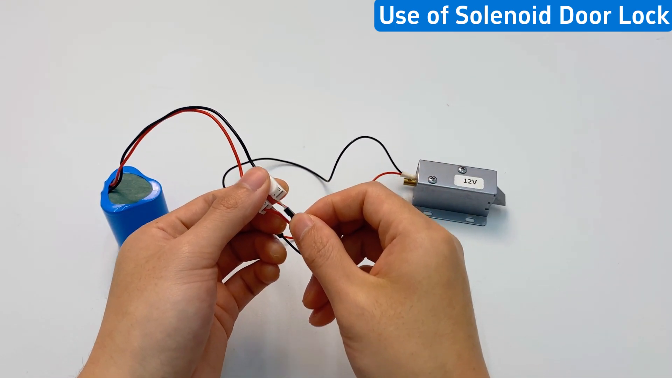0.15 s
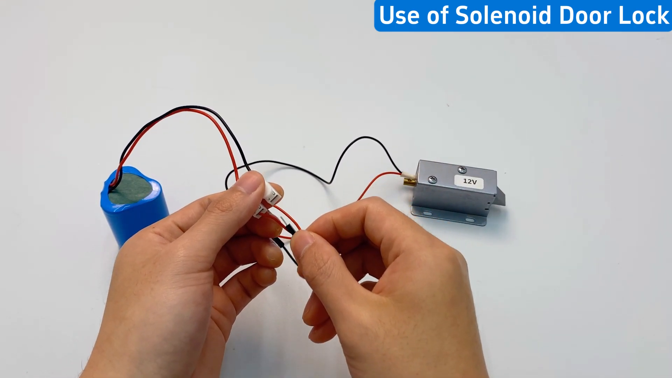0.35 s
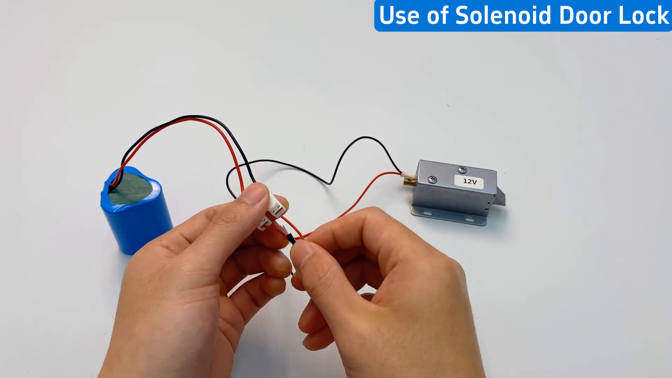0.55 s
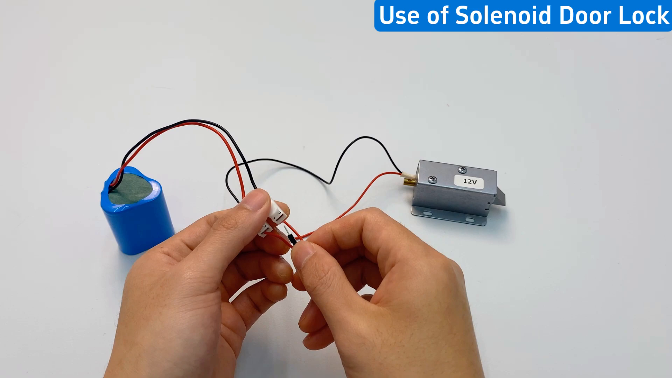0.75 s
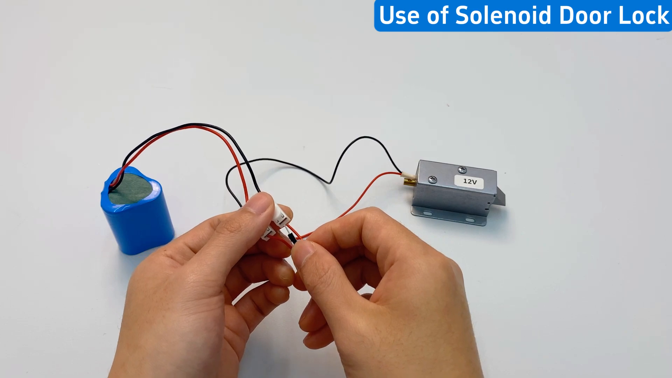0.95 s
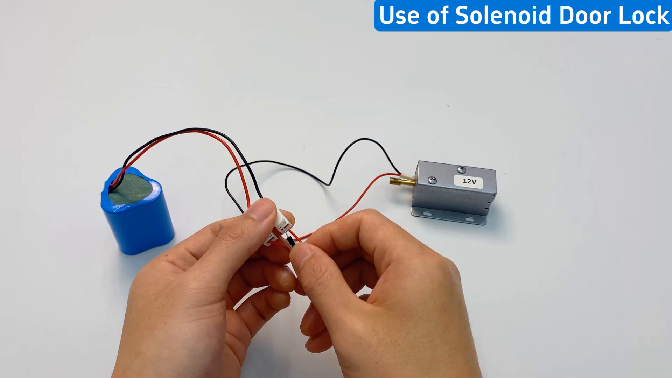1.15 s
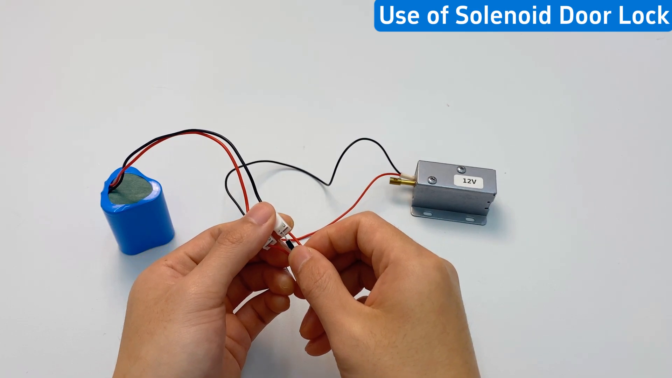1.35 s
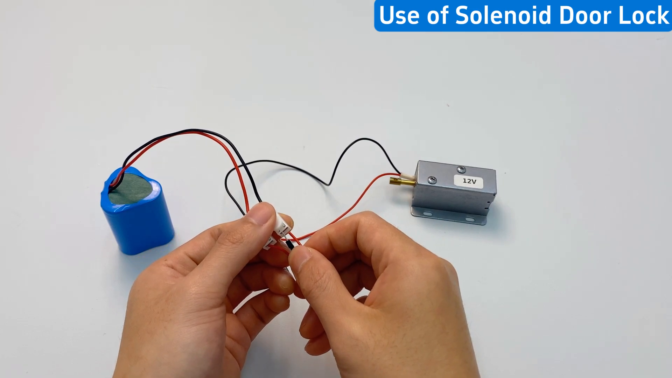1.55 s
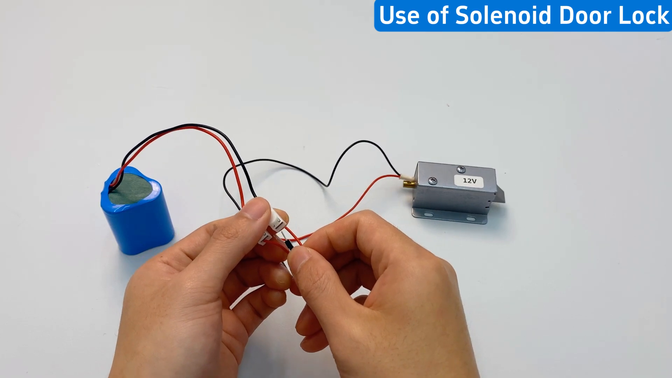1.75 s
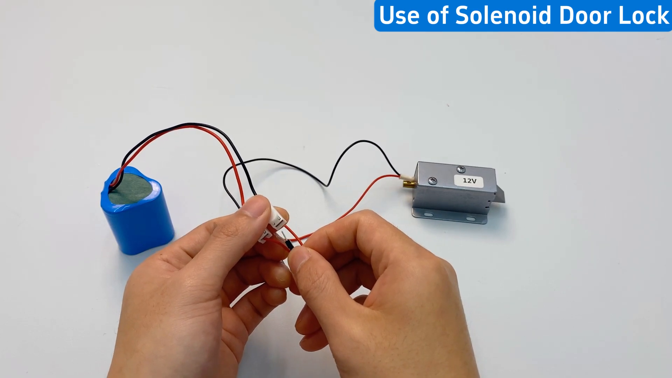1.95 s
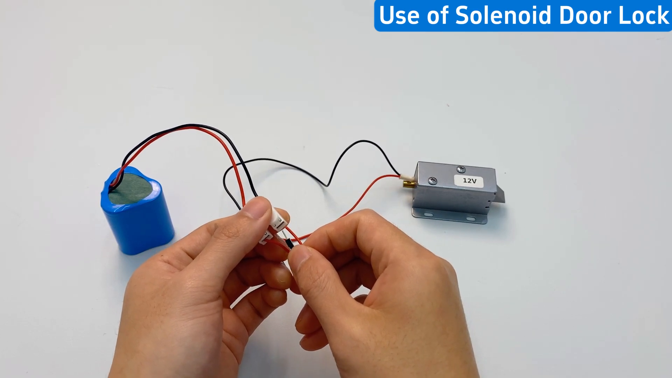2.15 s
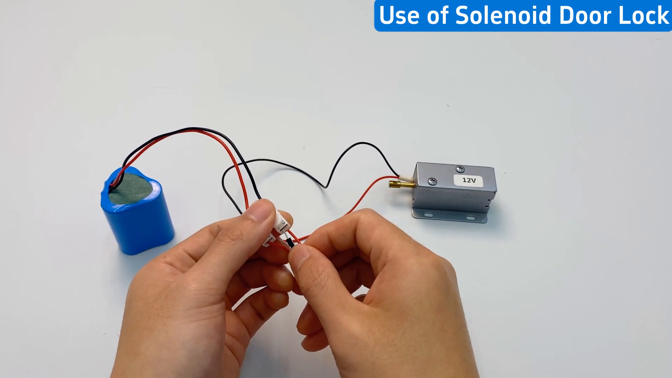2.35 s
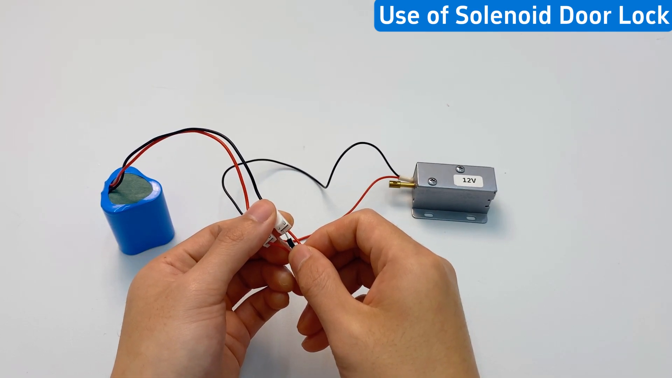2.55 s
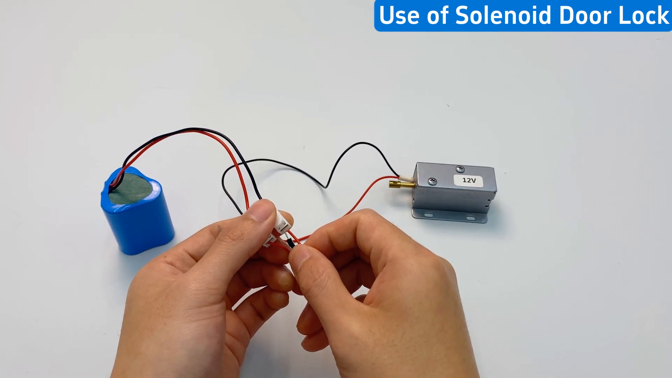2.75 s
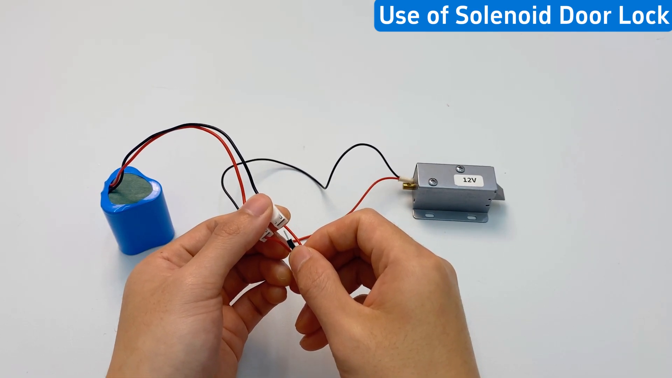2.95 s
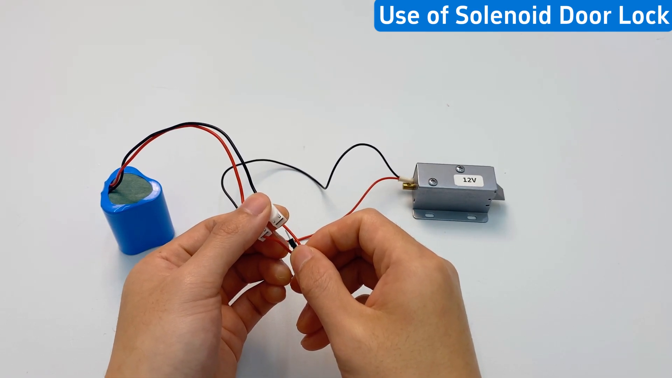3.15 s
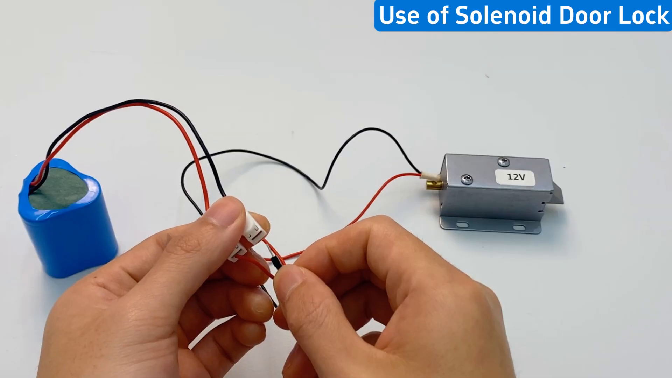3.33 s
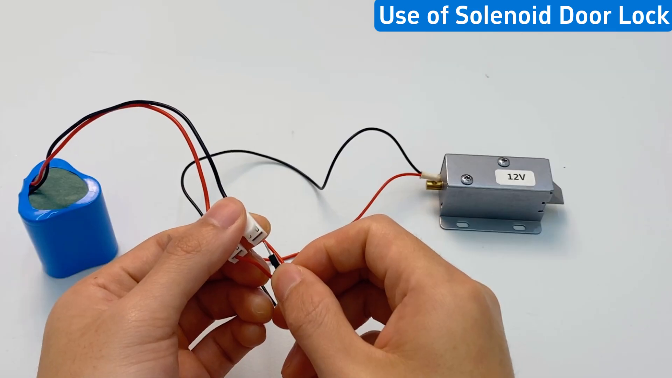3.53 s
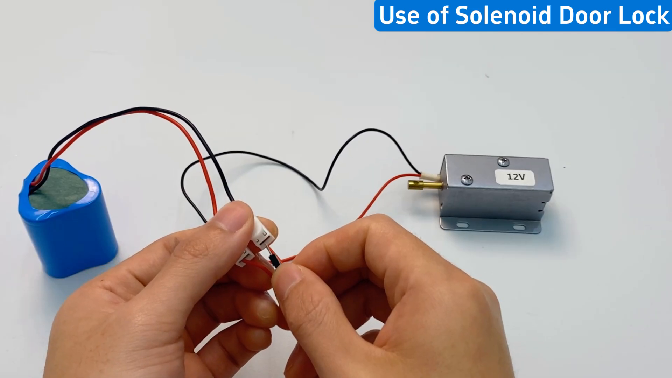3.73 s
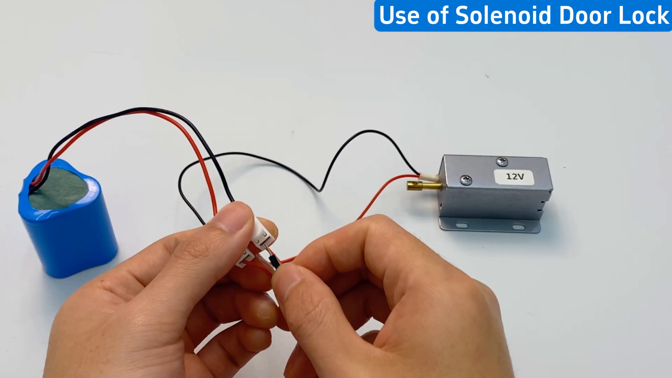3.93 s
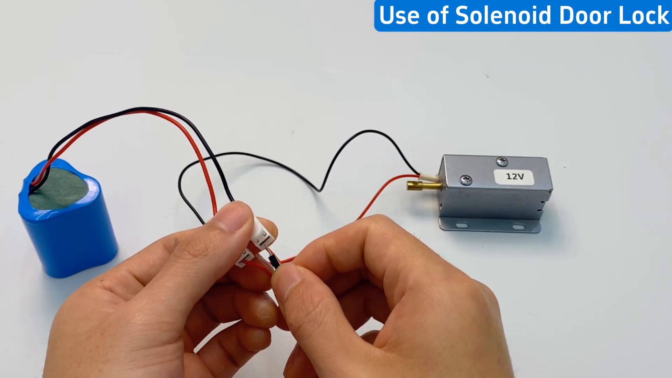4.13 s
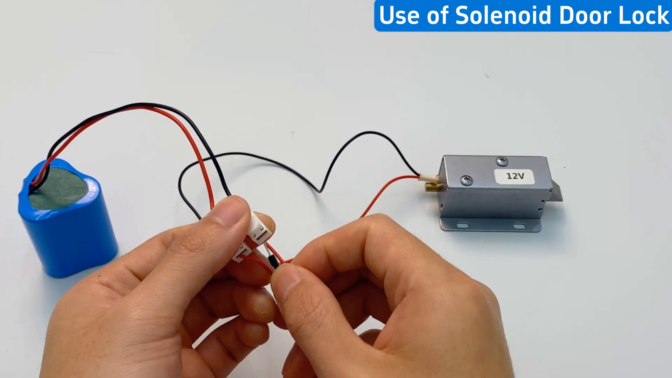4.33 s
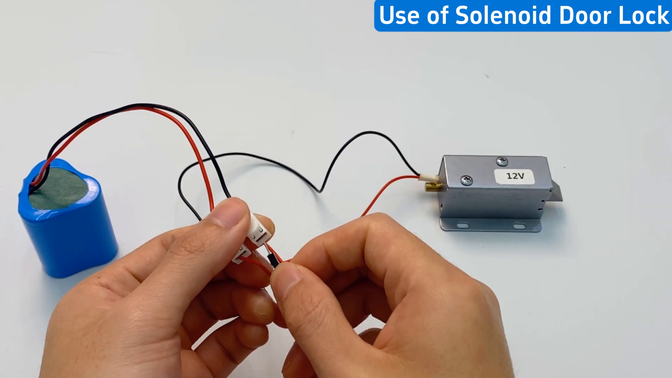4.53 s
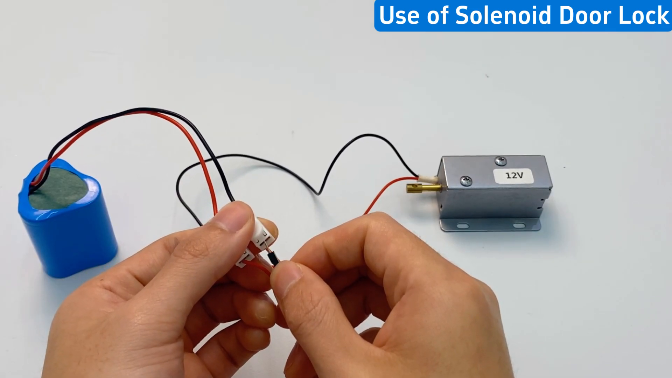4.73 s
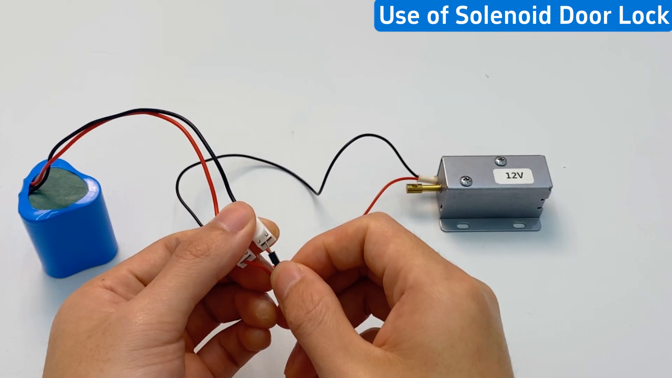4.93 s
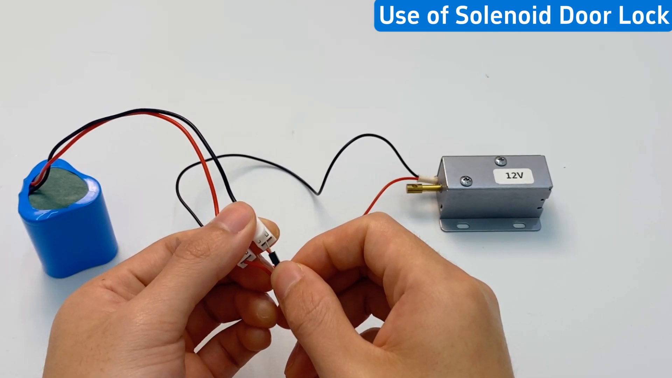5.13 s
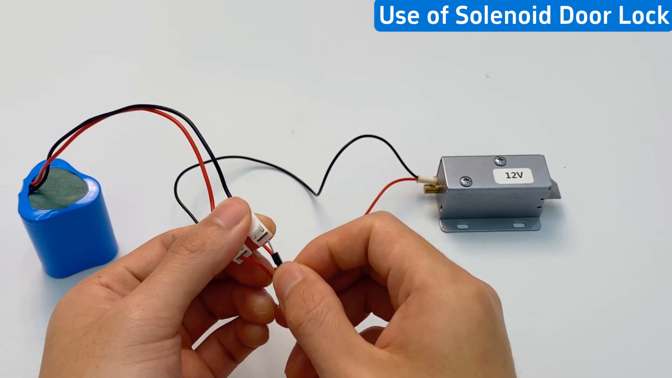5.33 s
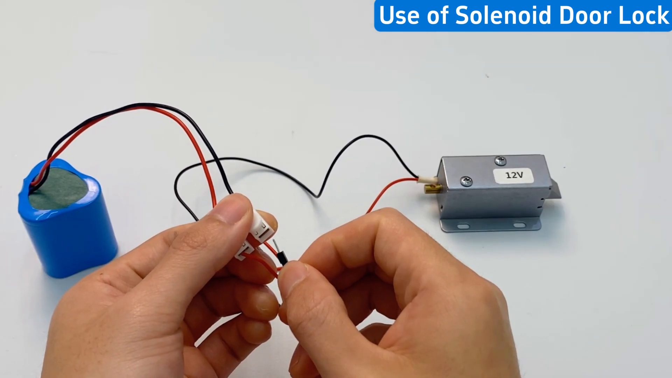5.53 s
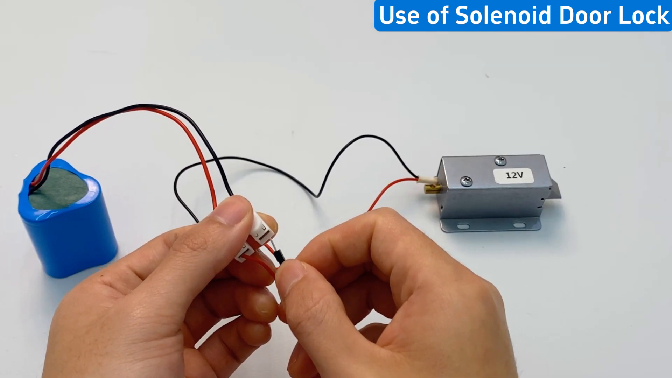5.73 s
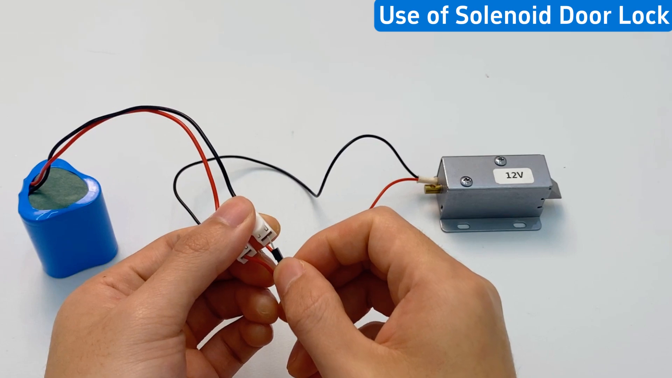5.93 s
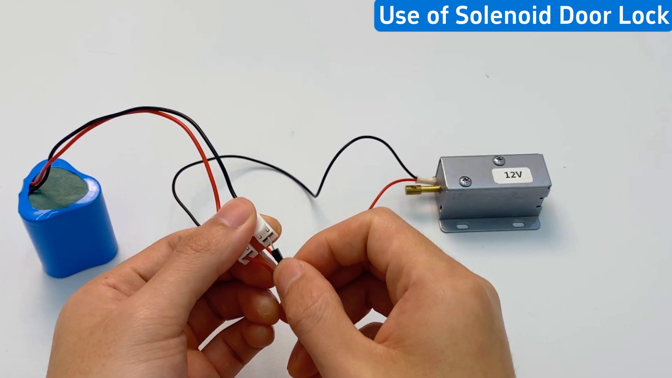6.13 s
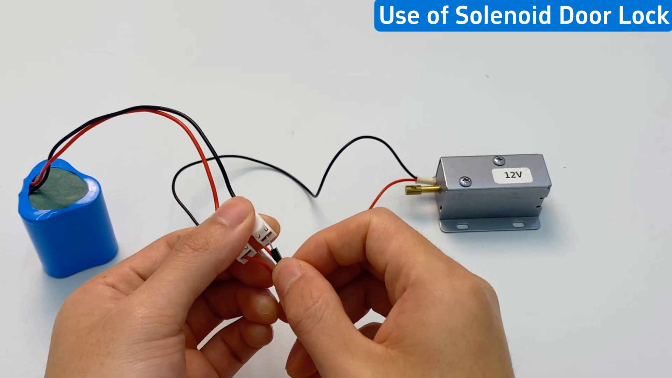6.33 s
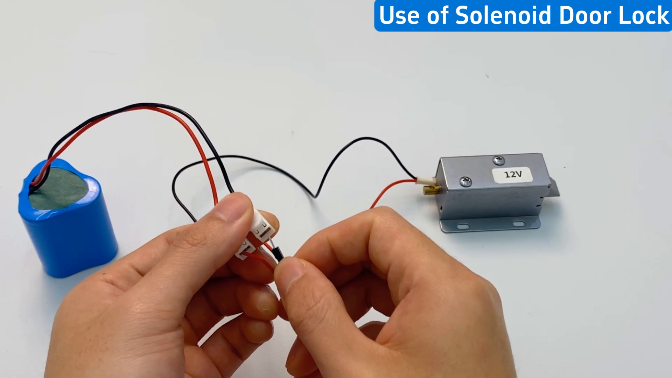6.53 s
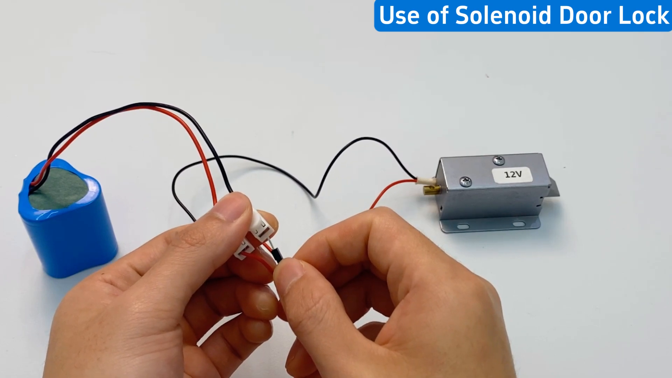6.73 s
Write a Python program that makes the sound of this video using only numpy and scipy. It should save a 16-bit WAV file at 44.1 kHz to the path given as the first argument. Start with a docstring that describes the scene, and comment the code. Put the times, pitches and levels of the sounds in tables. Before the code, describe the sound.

Loud, crisp metal clacks from a small electric door lock, bolt pulling in and shooting out irregularly, each with a bench thump and short room echo.

```python
"""A bare room, where a small solenoid lock lies on a bench and a battery lead is touched on and off by hand.
With power the plunger snaps into the core; without it the spring throws the bolt along its guide to its stop.
Each blow is a burst of noise filtered by the modes of the steel case; decaying sines give the bench thump.
Decaying noise serves as the room's echoes, and shaped noise as a faint, slightly wavering rumble."""
import sys
import numpy as np
from scipy import signal
from scipy.fft import rfft, irfft
from scipy.io import wavfile
from scipy.ndimage import uniform_filter1d

SR = 44100
rng = np.random.default_rng(int(sys.argv[2]) if len(sys.argv) > 2 else 0)


def generate_wav(sig):
    """Save sig (samples, or channels by samples) to the path in sys.argv[1] as 16-bit PCM at SR."""
    pcm = np.round(np.clip(np.atleast_2d(sig).T, -1, 1) * 32767).astype(np.int16)
    wavfile.write(sys.argv[1], SR, pcm)


N = 303408

# bolt thrown out by its spring: landing_s, blow_db, contact_spread_ms, bench_thump_db
BOLT_THROWS = [(0.1137, -0.5, 0.38, 2.5), (1.6890, 0, 1.1, 3), (2.8021, 0.3, 0.77, 2),
               (4.1838, -0.5, 0.58, 3), (5.34, -1.5, 0.75, 2), (6.4708, -0.34, 1.44, -0.5)]
LEAD_S = .06   # a blow's sound starts this long before its landing
SIZE = 65536   # samples in one blow
# time (s) and frequency (Hz) axes of one blow
T = np.arange(SIZE) / SR
HZ = np.arange(SIZE // 2 + 1) * SR / SIZE


def blows(rows, body, echoes, clang_db, side_db, chatter_db, swell_in_db, swell_in_s, swell_share):
    """Source and filter: each force excites the lock, heard directly and by way of the room, and thumps the bench."""
    # quickly damped clang of bolt and plunger: mode_hz, width_hz, relative_level_db
    clang_modes = [(3620, 350, 19), (7050, 250, 10), (8350, 500, 8), (11750, 350, 18), (12900, 400, 9),
                   (15250, 400, 6)]
    port_lag_s = .00002   # the right microphone hears the direct sound later
    lag = np.exp(-2j * np.pi * HZ * np.array([[0], [port_lag_s]]))
    ports = from_db([[-side_db], [side_db]]) * lag
    direct = with_modes(abs(body), clang_modes, clang_db) * ports
    out = np.zeros((2, N))
    for landing_s, blow_db, spread_ms, thump_db in rows:
        force = contact(spread_ms, chatter_db, chatter_s=0.0039,
                        swell_in_db=swell_in_db, swell_in_s=swell_in_s, likeness=.55)
        force = force * from_db(blow_db) * seating(vary_db=2.5)
        lock_sound = irfft(force * (direct + body * echoes))
        boom = thump(early_s=.002, swell_share=swell_share, side_db=1.5, vary_db=2.0)
        add(out, landing_s - LEAD_S, lock_sound + from_db(thump_db) * boom)
    return out


def contact(spread_ms, chatter_db, chatter_s, swell_in_db, swell_in_s, likeness):
    """Impact force: noise swells briefly into the landing, a tight cluster of contacts, and chatter decays to rest."""
    t = T - LEAD_S
    landing = np.exp(-.5 * (t * 1000 / spread_ms) ** 2)
    chatter = from_db(chatter_db) * np.exp(-abs(t) / chatter_s)
    swell_in = from_db(swell_in_db) * np.exp(-abs(t) / swell_in_s)
    envelope = landing + np.where(t > 0, chatter, swell_in)
    force = stereo(rng.standard_normal((2, SIZE)), likeness) * envelope
    # hard steel contacts spread their energy evenly over frequency: keep only the phase
    even = irfft(np.exp(1j * np.angle(rfft(force))))
    even = even * np.minimum(1, 10 * envelope)
    unit_energy = even / np.sqrt(np.sum(even ** 2, axis=1, keepdims=True))
    return rfft(unit_energy)


def seating(vary_db):
    """Varying modal excitation: no two blows seat alike, hence a fine random ripple over frequency."""
    ripple = rng.standard_normal(size=450)
    ripple_hz = np.linspace(0, SR / 2, len(ripple))
    return causal(from_db(vary_db * np.interp(HZ, ripple_hz, ripple)))


def case(crack, level_column, width_hz, ring_db):
    """Modal resonance: the steel case rings in clusters of close modes, weighted by where it is struck."""
    # modes of the case: mode_hz, pulled_in_relative_db, thrown_out_relative_db
    case_modes = [(1139, 11, 20), (1322, 15, 20), (1381, 14, 21), (1448, 14, 21), (1744, 12, 22),
                  (3330, 19, 17), (3472, 24, 21), (3583, 24, 22), (3634, 23, 21), (3698, 23, 21),
                  (3795, 23, 14), (3844, 23, 12), (3986, 21, 19), (4078, 21, 21), (4167, 20, 16),
                  (4955, 17, 21), (5033, 18, 17), (6245, 18, 11), (6342, 21, 14), (6390, 18, 15),
                  (6457, 20, 19), (6516, 22, 16), (6624, 24, 12), (7071, 13, 6), (8387, 12, 12),
                  (12158, 14, 13)]
    modes = [(mode[0], width_hz, mode[level_column]) for mode in case_modes]
    return with_modes(from_db(over_hz(crack)), modes, ring_db)


def thump(early_s, swell_share, side_db, vary_db):
    """Recoil drives low damped modes, never twice alike; the longer a mode lasts, the slower it builds."""
    # modes of bench top and room: mode_hz, t60_s, relative_starting_level_db
    bench_modes = [(54.6, 0.6, -52.5), (71, 0.34, -47), (104.9, 0.66, -35), (118, 0.21, -40),
                   (145, .2, -34.5), (159.8, 0.49, -32), (210, 0.18, -30), (235.4, 0.36, -41),
                   (280, 0.098, -48), (319.4, 0.45, -42.5), (356.6, 0.24, -35.5), (414, 0.16, -42.5),
                   (595, 0.38, -46.5), (729, 0.17, -51.5)]
    t = np.maximum(T - LEAD_S + early_s, 0)
    swings = 0
    chance_db = vary_db * rng.standard_normal(len(bench_modes))
    for k, (hz, t60_s, level_db) in enumerate(bench_modes):
        decay = from_db(level_db + chance_db[k] - 60 * t / t60_s)
        build = 1 - np.exp(-t / (swell_share * t60_s))
        sign = (-1) ** k   # neighbouring modes start in opposite directions
        swings = swings + sign * decay * build * np.sin(2 * np.pi * hz * t)
    return swings * from_db([[-side_db], [side_db]])


def unlatch(body, echoes, tick_db, tick_room_db, low_hz):
    """Release and friction: current stops, the plunger leaves the core with a thin tick, the bolt knocks its guide."""
    # knocks along the guide in every throw: before_landing_s, case_shove_db, scrape_db
    guide_knocks = [(0.021, -3.5, -18.5), (.011, 10, -15)]
    bolt_travel_s = .0355   # from leaving the core to landing on the stop
    high_pass = (1j * HZ / (low_hz + 1j * HZ)) ** 2
    thin = body * high_pass * (0.5 + resonance(hz=5400, width_hz=1300, db=0.5))
    tick_path = thin * (1 + from_db(tick_room_db) * echoes)
    shove = resonance(hz=189, width_hz=51, db=3.5)
    scrape = resonance(hz=4046, width_hz=1400, db=2) + resonance(hz=11800, width_hz=2200, db=-4)
    out = np.zeros((2, N))
    for landing_s, *_ in BOLT_THROWS:
        tick = contact(spread_ms=0.85, chatter_db=-19, chatter_s=.003,
                       swell_in_db=-20, swell_in_s=0.0017, likeness=0.28)
        add(out, landing_s - bolt_travel_s - LEAD_S, from_db(tick_db) * irfft(tick * tick_path))
        for before_s, shove_db, scrape_db in guide_knocks:
            knock = contact(spread_ms=2.0, chatter_db=-9.5, chatter_s=0.0071,
                            swell_in_db=-17.5, swell_in_s=.003, likeness=0.5)
            knock_path = from_db(shove_db) * shove + from_db(scrape_db) * scrape
            add(out, landing_s - before_s - LEAD_S, irfft(knock * knock_path))
    return out


def room(gap_s, build_s):
    """Reverberation: dense echoes swell after a short gap, then each band decays at its own rate."""
    # reverberation: band_hz, level_against_direct_db, t60_s, left_right_likeness
    reverberation = [(60, 16.5, 0.7, 1), (202, 14.5, 0.35, 0.39), (510, 9, 0.28, 0.47),
                     (1330, -0.43, 0.4, 0.36), (2360, -0.5, 0.45, .25), (4000, 2.5, 0.46, 0.12),
                     (6800, 5, 0.46, 0.27), (8800, -2.5, 0.41, 0.13), (15100, -4.5, 0.32, .1)]
    white = stereo(rfft(rng.standard_normal((2, SIZE))), over_hz(reverberation, column=3))
    swell = 1 - np.exp(-np.maximum(T - gap_s, 0) / build_s)
    band_of = np.floor(2 * np.log2(np.maximum(HZ, 50) / 50))   # half octaves
    t60_s = over_hz(reverberation, column=2)
    tail = 0
    for band in np.unique(band_of):
        inside = band_of == band
        decay = from_db(-60 * T / t60_s[inside].mean())
        tail = tail + irfft(white * inside) * swell * decay
    # the echoes keep their fine ripple, while the walls set their broad colour
    echoes = rfft(tail)
    broad = np.sqrt(uniform_filter1d(np.mean(abs(echoes) ** 2, axis=0), size=150))
    return echoes * causal(from_db(over_hz(reverberation)) / broad)


def rumble(level_db, waver_db):
    """Filtered noise: a dull room rumble wavers a little, its level set in the 500-1500 Hz band."""
    # spectral shape: band_hz, relative_density_db
    rumble_shape = [(25, -26), (55, -9), (80, -12), (107, -4), (140, -11), (230, -15), (330, -18.5),
                    (470, -19.5), (620, -16.5), (1000, -12.5), (1350, -20), (2000, -37), (4000, -47.5),
                    (15000, -63.5)]
    # likeness of left and right: band_hz, likeness (-1 to 1)
    rumble_likeness = [(60, 0.8), (240, 0.7), (950, -0.5), (3770, 0.35), (15000, 0.09)]
    hz = np.arange(N // 2 + 1) * SR / N
    likeness = np.interp(hz, HZ, over_hz(rumble_likeness))
    noise = stereo(rfft(rng.standard_normal((2, N))), likeness)
    noise = noise * from_db(np.interp(hz, HZ, over_hz(rumble_shape)))
    in_middle = (hz > 500) & (hz < 1500)
    middle_rms = irfft(noise.mean(axis=0) * in_middle, N).std()
    steps = rng.standard_normal(size=50)
    waver = np.interp(np.linspace(0, len(steps) - 1, N), np.arange(len(steps)), steps)
    return irfft(noise, N) / middle_rms * from_db(level_db + waver_db * waver)


def from_db(db):
    """Logarithmic level: 20 dB is a tenfold amplitude."""
    return 10 ** (np.asarray(db) / 20)


def over_hz(points, column=1):
    """Interpolation: a table's column is joined by straight lines in log frequency."""
    points = np.array(points)
    return np.interp(np.log(HZ + 1), np.log(points[:, 0]), points[:, column])


def causal(gain):
    """Minimum phase: a folded cepstrum gives this gain a response with no sound before its cause."""
    cepstrum = irfft(np.log(gain))
    folded = 2 * cepstrum * (np.arange(SIZE) < SIZE // 2)
    return np.exp(rfft(folded) - cepstrum[0])


def resonance(hz, width_hz, db):
    """Damped oscillator: the response of one mode, db high at its top."""
    damping = 1j * HZ * width_hz
    return from_db(db) * damping / (hz ** 2 - HZ ** 2 + damping)


def with_modes(gain, modes, ring_db):
    """Energy summation: modes stand out of a broad spectrum in one causal response."""
    mode_power = sum(abs(resonance(hz, width_hz, db + ring_db)) ** 2 for hz, width_hz, db in modes)
    return causal(np.sqrt(gain ** 2 + mode_power))


def stereo(pair, likeness):
    """Correlation: sum and difference of two unrelated signals give a left and right of given likeness."""
    likeness = np.clip(likeness, -.99, .99)
    shared = np.sqrt(1 + likeness) * pair[0]
    opposed = np.sqrt(1 - likeness) * pair[1] * np.array([[1], [-1]])
    return (shared + opposed) / np.sqrt(2)


def add(out, start_s, sound):
    """Superposition: a sound is added to the mix from a given time."""
    start = max(round(start_s * SR), 0)
    out[:, start:start + SIZE] += sound[:, :N - start]


def scene():
    """Superposition of pulls, throws and releases in one room, over its rumble."""
    # plunger pulled in: landing_s, blow_db, contact_spread_ms, bench_thump_db
    plunger_pulls = [(1.1151, -0.17, 0.37, 1), (2.3005, 0.2, 0.31, -3), (3.7472, -0.64, 0.79, -0.5),
                     (4.7269, 0.1, 0.52, -3), (6.0506, 0.5, 0.64, 1)]
    # broad crack of the contact, pulled in and thrown out: band_hz, level_db
    pull_crack = [(60, -12), (200, 2), (600, 2), (950, 5.5), (2000, 3.5), (2450, 4), (2900, 5.5),
                  (4200, 9.5), (5600, 1), (7000, 5.5), (8500, 2.5), (10600, 8.5), (12800, 6.5), (14200, -4),
                  (15300, 1.5)]
    throw_crack = [(60, -8), (200, 6), (700, 4), (1100, 13), (1750, 14), (2050, 12), (2400, 10.5),
                   (2900, 5.5), (4400, 10), (5800, 1.5), (8400, 3), (10600, 10), (12800, 2), (14200, -3),
                   (15300, 2)]
    echoes = room(gap_s=0.0013, build_s=0.0012)
    pulled = case(pull_crack, level_column=1, width_hz=48, ring_db=-6)
    thrown = case(throw_crack, level_column=2, width_hz=19, ring_db=-3.5)
    pulls = blows(plunger_pulls, pulled, echoes, clang_db=-0.5, side_db=1.0,
                  chatter_db=-9.5, swell_in_db=-21.5, swell_in_s=0.0094, swell_share=0.029)
    throws = blows(BOLT_THROWS, thrown, echoes, clang_db=-5, side_db=1.4,
                   chatter_db=-9.0, swell_in_db=-11, swell_in_s=.002, swell_share=0.034)
    release = unlatch(thrown, echoes, tick_db=-22, tick_room_db=-7, low_hz=1400)
    return pulls + throws + release + rumble(level_db=-67.5, waver_db=1.0)


def record(dry):
    """Saturation and low-pass filtering: the highest peaks are rounded and the top is cut steeply."""
    cutoff_hz = 15900
    rounded = 1.2 * np.tanh(dry / 1.2)
    low_pass = signal.cheby1(12, .1, cutoff_hz, fs=SR, output="sos")
    return signal.sosfilt(low_pass, rounded)


dry = scene()
out = record(dry)
generate_wav(out)
```